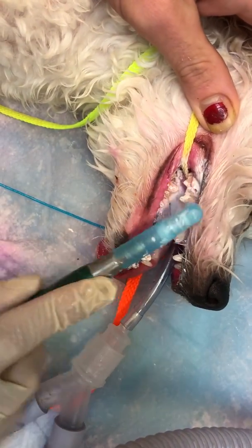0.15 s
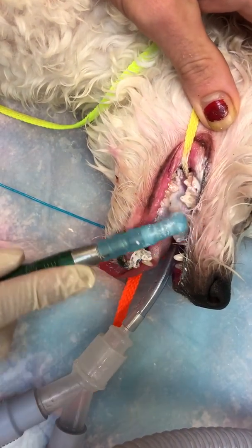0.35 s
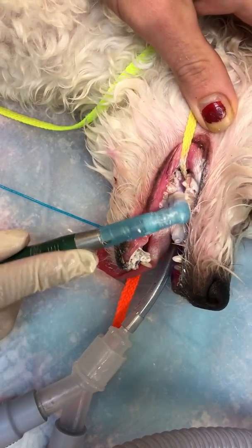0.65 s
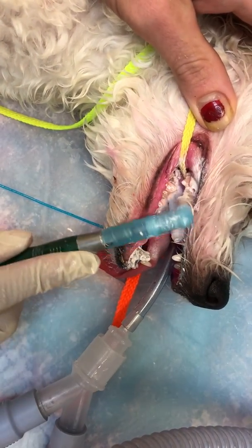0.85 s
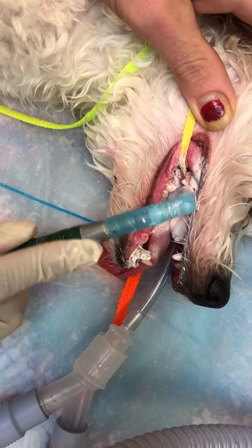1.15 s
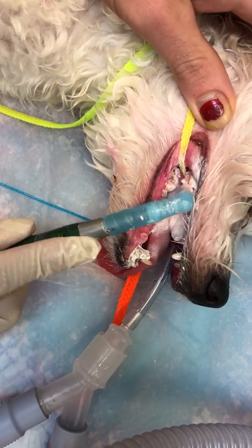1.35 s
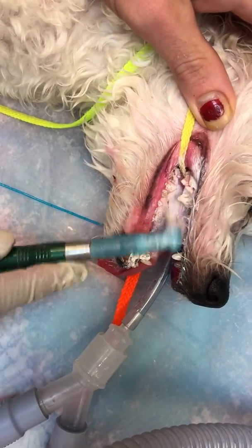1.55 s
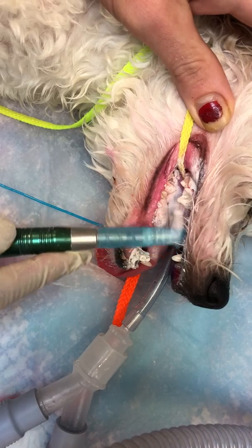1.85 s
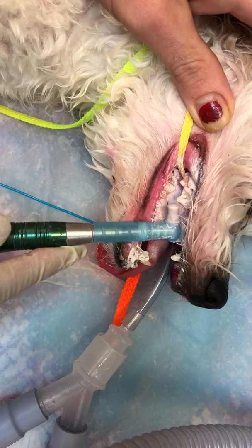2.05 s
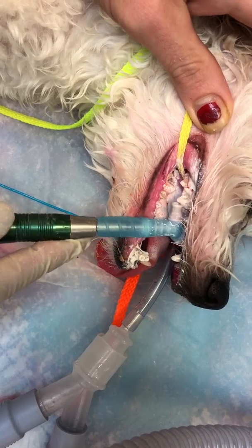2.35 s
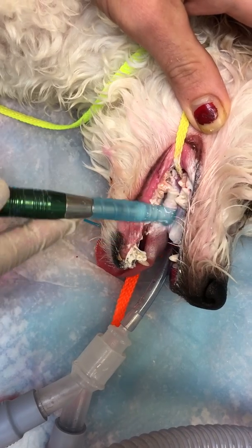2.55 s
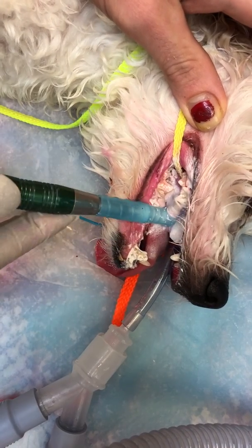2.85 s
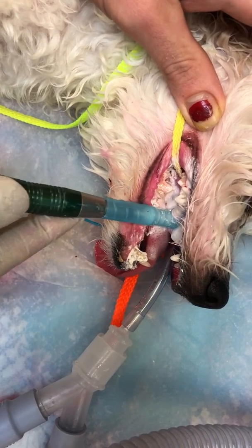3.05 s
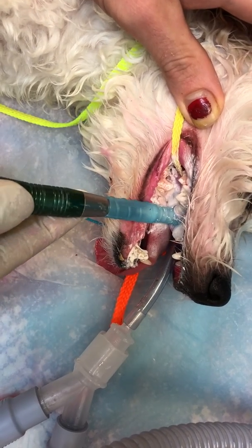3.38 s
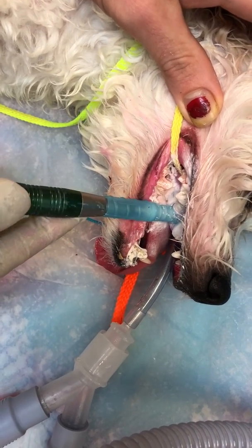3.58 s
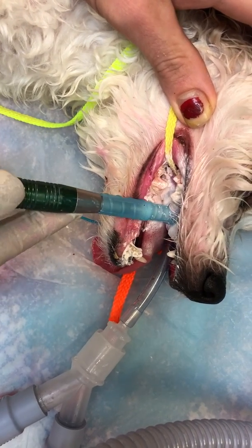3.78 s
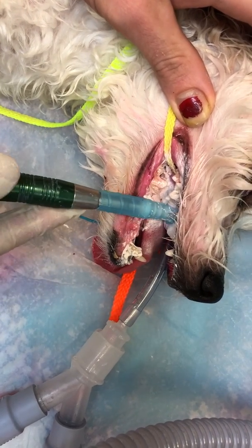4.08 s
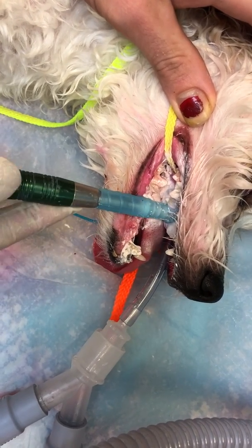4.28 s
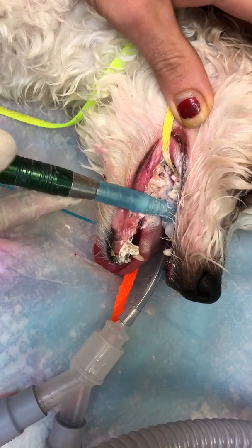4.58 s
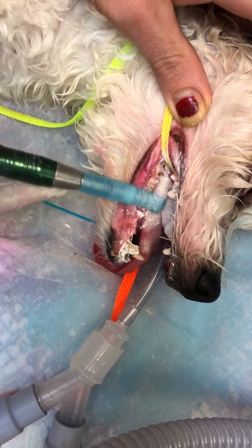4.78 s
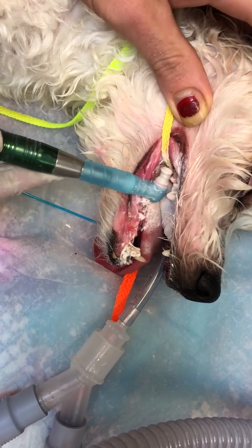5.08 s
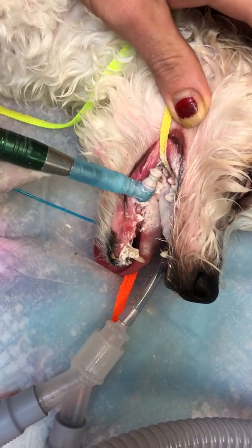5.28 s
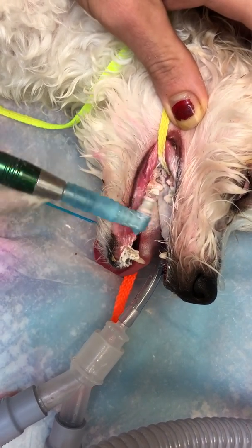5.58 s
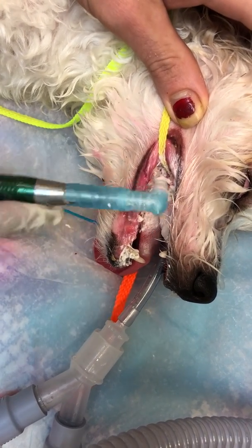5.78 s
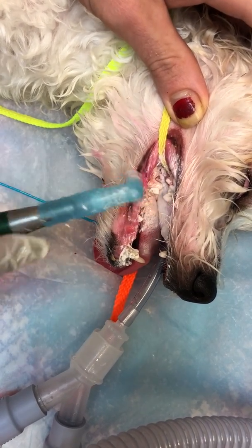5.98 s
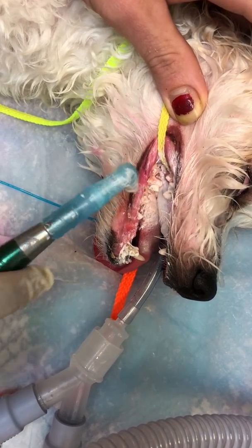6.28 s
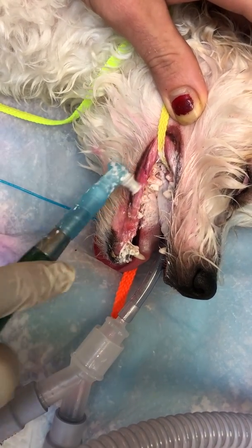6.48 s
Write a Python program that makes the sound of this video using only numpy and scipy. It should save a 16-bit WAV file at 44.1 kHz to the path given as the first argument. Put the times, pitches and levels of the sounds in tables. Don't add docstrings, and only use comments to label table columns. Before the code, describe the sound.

A small air-driven polishing handpiece is already running at the start and never stops, heard close on a mono phone microphone in a clinic room. Its high, steady whine stacks several piercing tones around two to eight kilohertz, with a metallic ring and fast gear chatter, about seventy knocks a second, making a rough buzz. From 0 to 1.6 s short touches on teeth make the pitch dip slightly and the rattle thicken. Around 1.8 to 2.4 s the ring thins. From about 2.7 s it turns brighter, with stronger air hiss and crisp clicking, and longer presses at 3.1 to 4.9 s hold the pitch a little lower. A soft, low table thud lands near 4.95 s. The pitch then rises slightly; hiss recedes after 5.7 s as the whine wavers to the end at about 6.5 s. A low compressor hum and dull ventilation noise continue unchanged underneath.

```python
import sys
import numpy as np
from scipy import signal
from scipy.io import wavfile
from scipy.ndimage import uniform_filter1d

SR = 44100
rng = np.random.default_rng(int(sys.argv[2]) if len(sys.argv) > 2 else 0)


def store_pcm(level_fs):
    pcm = np.round(np.clip(level_fs, -1, 1) * 32767).astype(np.int16)
    wavfile.write(sys.argv[1], SR, np.atleast_2d(pcm).T)


def gain_from_db(level_db):
    decades = np.asarray(level_db, float) / 20
    return 10 ** decades


N = 292383
T = np.arange(N) / SR

# [t/s, exhaust nearness/dB, grip on the sleeve/dB]
NEARNESS = [(.12, -38, -40), (.3, -38.5, -44), (.84, -40.5, -42), (1.42, -38, -39.5), (1.7, -40.5, -42),
            (2.1, -40, -40), (2.4, -35, -38), (2.54, -36, -40.5), (2.85, -29.5, -36.5), (3.64, -26, -32),
            (4.2, -29, -37.5), (4.46, -27.5, -36.5), (5.04, -29.5, -40), (5.46, -28, -37),
            (5.66, -29.5, -43), (5.9, -36, -42), (6.15, -38, -45), (6.35, -36, -41)]


def amp_rms(db, x):
    return gain_from_db(db) * x / np.sqrt(np.mean(x ** 2) + 1e-20)


def read_spectrum(points, hz):
    f, value = np.transpose(points)
    return np.interp(np.log(hz + 1), np.log(f + 1), value)


def curves(rows):
    s, *columns = np.transpose(rows)
    return [np.interp(T, s, column) for column in columns]


def drift(hz):
    b, a = signal.butter(2, min(hz / SR * 2, .9))
    return amp_rms(0, signal.lfilter(b, a, rng.standard_normal(N)))


def noise(points, patchy_db):
    frames, hz = N // 256 + 5, np.fft.rfftfreq(1024, 1 / SR)
    a, b, patches = rng.standard_normal((frames, 513, 3)).T
    patches = uniform_filter1d(patches, size=9, axis=0)
    patches = amp_rms(0, uniform_filter1d(patches, size=60, axis=1))
    z = (a + 1j * b) * gain_from_db(read_spectrum(points, hz)[:, None] + patchy_db * patches)
    return amp_rms(0, signal.istft(z, nperseg=1024, noverlap=768)[1][:N])


def click(points):
    hz = abs(np.fft.fftfreq(2048, 1 / SR))
    log_gain = np.log(gain_from_db(read_spectrum(points, hz)))
    phase = -signal.hilbert(log_gain).imag
    pulse = np.fft.ifft(np.exp(log_gain + 1j * phase)).real[:512]
    return pulse / np.linalg.norm(pulse)


def compressor():
    # [multiple of the pump speed, level/dB]
    pump_tones = [(2, -61.5), (4, -49.5), (5, -91), (6, -54), (7, -63.5), (8, -46), (9, -48), (10, -44.5),
                  (11, -52.5), (12, -53), (13, -64.5), (14, -64), (16, -61.5), (17, -64.5), (19, -60.5),
                  (20, -63.5), (21, -58), (22, -66.5), (29, -65.5), (32, -79), (33, -56.5), (34, -58.5),
                  (35, -60), (36, -58), (39, -55),
                  (43, -84), (52, -62)]
    # [f/Hz, level per Hz/dB]
    room_colour = [(21, -48), (35, -5), (82, -19.5), (135, -2), (208, -5), (254, -8), (336, -13),
                   (620, -14), (787, -12), (998, -16), (1510, -19), (1960, -19), (2160, -14.5),
                   (3350, -13.5), (4000, -17.5), (5200, -50), (8800, -120)]
    pump_hz, room_db = 23.385, -41
    turns = pump_hz * T + 0.0036 * drift(1.6)
    hum = np.zeros(N)
    for k, db in pump_tones:
        k = round(k)
        room_phase = .62 * k ** 2
        hum += np.sqrt(2) * gain_from_db(db) * np.sin(2 * np.pi * k * turns + room_phase)
    return hum + gain_from_db(room_db) * noise(room_colour + [(7000, -60)], patchy_db=1.9)


def bumps():
    # [t/s, level/dB, time to fade by 60 dB/s]
    hits = [
        (4.94, -34, .14),
        (4.96, -31, .12),
        (4.99, -32.5, .16),
        (2.28, -43, .121),
    ]
    # [f/Hz, level per Hz/dB]
    table_colour = [(40, 3), (80, -3), (280, 3), (420, -10), (1000, -16.5), (1400, -29)]
    envelope = np.zeros(N)
    for start, db, t60 in hits:
        t = np.maximum(T - start, 0)
        rise = 1 - np.exp(-t / 0.0018)
        envelope += gain_from_db(db - 60 * t / t60) * rise
    return noise(table_colour, patchy_db=1.5) * envelope


def presses():
    # [start/s, length/s, speed sag/Hz, dull knock/dB, bright click/dB]
    touches = [(0.068, 0.095, 2.9, -44, -53), (0.303, 0.074, 0.16, -56, -47), (0.521, .12, 0.22, -52, -55),
               (0.663, .08, 1.5, -38.5, -47), (.75, 0.072, 0.35, -48, -44), (0.917, .17, 1.5, -46.5, -54),
               (1.079, .11, 4.5, -41, -53), (1.203, 0.085, 2.5, -52, -46), (1.348, 0.12, 3.4, -48, -44),
               (1.448, .15, 5, -45, -53), (1.674, 0.055, 0.23, -50, -59), (1.795, .06, 0.7, -44, -55),
               (2.276, 0.086, 2.95, -65, -60), (2.491, 0.11, 1.36, -70, -46), (2.662, 0.087, 3.5, -57, -37),
               (2.765, .1, 3.3, -57, -41), (2.922, 0.13, 1.4, -50, -55), (3.119, 0.33, 1.6, -41, -60),
               (3.47, 0.59, 1.59, -39.5, -45), (4.298, 0.23, 2.74, -48, -37),
               (4.562, 0.3, 2.65, -51, -39.5), (5.301, 0.36, 1.1, -56, -48), (5.639, .16, 0.21, -56, -42),
               (5.938, 0.21, .2, -68, -56)]
    ramp_s = .04
    idle_dull_db, idle_bright_db = -60, -45.5
    start, length, sag, dull_db, bright_db = np.transpose(touches)[..., None]
    shape = np.clip(np.minimum(T - start, start + length - T) / ramp_s, 0, 1)

    def level(db, idle_db):
        return 20 * np.log10(gain_from_db(idle_db) + (gain_from_db(db) * shape).sum(0))
    return (sag * shape).sum(0), level(dull_db, idle_dull_db), level(bright_db, idle_bright_db)


def air():
    # [f/Hz, level per Hz/dB]
    hiss_colour = [(900, -34), (1300, -23), (1900, -7.5), (2700, -21), (3300, -13), (3900, -9), (5000, -6),
                   (7000, -1), (8800, 0), (11500, -2.5), (14000, -2), (16000, -1.5)]
    # [f/Hz, level per Hz/dB]
    rub_colour = [(1200, -35), (1700, -14), (2800, -24), (3500, -0.5), (4000, 3), (4800, 2.5), (5800, 0),
                  (7000, -15)]
    hiss_db, grip_db = curves(NEARNESS)
    rub_db = grip_db + 0.096 * (presses()[1] + 50)
    bursts = gain_from_db(0.97 * drift(710))
    hiss = noise(hiss_colour, patchy_db=2.0) * bursts
    return gain_from_db(hiss_db + 2.0) * hiss + gain_from_db(rub_db - 2.0) * noise(rub_colour, patchy_db=1.5)


def knocks():
    dull_db, bright_db = presses()[1:]
    middle_near_db = -35
    first_db = dull_db - 9 + .9 * (curves(NEARNESS)[0] - middle_near_db)
    last_db = bright_db - 3 + 2.5 * np.tanh(drift(2.7))
    return first_db, dull_db, bright_db, last_db


def gear(turns):
    knock_angles = (.13, .32, .82)
    # [f/Hz, level/dB]
    dull_colour = [(600, -36), (1300, -18), (1900, -11), (2600, -18), (3100, -12), (3800, -2), (4600, 3),
                   (5500, -9), (9000, -13), (16000, -24)]
    # [f/Hz, level/dB]
    bright_colour = [(1500, -22), (2500, 6.5), (5000, 7.5), (7000, 8), (10000, 11), (13000, 11.5),
                     (16000, 6), (20000, -44)]
    # (angle number, colour, gain dB, spread dB, scatter in cup turns, share of chatter)
    contacts = [(0, dull_colour, 3, .8, .001, 0),
                (1, dull_colour, 3, 1.2, .001, 0),
                (1, bright_colour, -.5, 2.2, .008, .8),
                (2, bright_colour, 0, 2.2, .02, .9)]
    cup_turns = turns / 4.75
    out = np.zeros(N)
    for db, (angle, colour, gain_db, spread_db, scatter, chatter) in zip(knocks(), contacts):
        chance = rng.standard_normal((int(cup_turns[-1]) - 1, 2))
        knock_turns = np.arange(len(chance)) + knock_angles[angle] + scatter * chance[:, 0]
        at = np.searchsorted(cup_turns, knock_turns)
        train = np.zeros(N)
        train[at] = gain_from_db(db[at] + spread_db * chance[:, 1] + gain_db) * np.sqrt(SR / 70)
        rebounds = signal.lfilter([0, .45], [1, -.95], train) * rng.standard_normal(N)
        hits = np.sqrt(1 - chatter ** 2) * train + chatter * .7 * rebounds
        out += signal.oaconvolve(hits, click(colour))[:N]
    return out


def rotor():
    # [t/s, speed/Hz]
    free_speed = [(.14, 335.5), (.27, 341), (.56, 343), (.68, 339.8), (2.08, 339), (2.3, 336), (2.7, 334.5),
                  (2.95, 331.7), (3.45, 329), (4.0, 326.9), (4.16, 329.7), (4.83, 330), (4.96, 336.3),
                  (5.65, 337.4), (5.87, 339), (6.0, 343.2), (6.39, 343.2), (6.45, 340.7)]
    # [t/s, order 6/dB, order 12/dB]
    low_vanes = [(.12, -50, -39), (.36, -76, -42), (.62, -53.5, -38), (1.5, -49.5, -43.5), (1.64, -52, -41),
                 (1.77, -64, -41), (1.9, -51, -44), (2.15, -47, -39.5), (2.7, -45.5, -39.5),
                 (2.76, -44.5, -47), (3.15, -42.5, -42), (3.38, -42, -50), (3.52, -42.5, -40.5),
                 (5.55, -40.5, -35.5), (5.95, -51, -39.5), (6.14, -50.5, -41), (6.36, -47.5, -51),
                 (6.45, -46, -39.5)]
    # [t/s, order 18/dB, order 24/dB]
    high_vanes = [(.1, -38.5, -49), (.26, -34, -56), (.65, -37.5, -58), (1.65, -36.5, -60),
                  (1.86, -43, -51), (2.02, -59, -43), (2.25, -63, -47), (2.62, -45, -56),
                  (2.85, -35.5, -48), (3.6, -36, -66), (4.1, -45, -55), (4.55, -52, -60), (5.05, -53, -42),
                  (5.25, -36.5, -38), (5.52, -43, -41), (5.85, -30.5, -55.5), (6.38, -38, -52),
                  (6.5, -47, -60)]
    # [t/s, level/dB]
    ringing = [(.14, -34.5), (.35, -40.5), (.95, -40.5), (1.5, -36.5), (1.64, -39), (1.8, -49),
               (2.25, -52.5), (2.9, -34), (4.4, -33), (4.78, -33.5), (5.1, -42.5), (5.4, -37),
               (5.63, -37.5), (5.75, -54), (5.88, -38.5), (6.12, -43), (6.26, -35.5), (6.6, -50.5)]
    # [multiple of rotor speed, level re ring/dB]
    ring_orders = [(19, -11.5), (20, -8.5), (21, -3), (22, -11.5), (23, -10.5)]
    # [multiple of rotor speed, level re ring/dB]
    faint_orders = [(16, -30), (17, -20), (25, -59), (26, -30), (28, -43), (30, -15), (32, -29), (36, -18),
                    (42, -19)]
    housing_hz = 7003
    db6, db12 = curves(low_vanes)
    db18, db24 = curves(high_vanes)
    ring_db = curves(ringing)[0]
    hz = curves(free_speed)[0] - presses()[0]
    centre = housing_hz / hz
    turns = np.cumsum(hz * (1 + .0003 * drift(40))) / SR

    def order(k, db, flutter_db):
        level = gain_from_db(db + flutter_db * drift(9.8))
        return np.sqrt(2) * level * np.sin(2 * np.pi * (round(k) * turns + rng.random()))
    vanes = order(6, db6, .4) + order(12, db12, .6) + order(18, db18, .8) + order(24, db24, 1.1)
    ring = sum(order(k, ring_db + db + 6.0 * (k - 21) * (centre - 21), 1.86) for k, db in ring_orders)
    faint = sum(order(k, ring_db + db, 2.8) for k, db in faint_orders)
    low = signal.lfilter(*signal.butter(2, 600 / SR * 2), rng.standard_normal(N))
    carrier = np.cos(2 * np.pi * np.cumsum(centre * hz) / SR)
    gate = 1 + 0.16 * np.cos(2 * np.pi * turns)
    puffs = amp_rms(0, low * carrier * gate)
    return vanes + ring + faint + gain_from_db(ring_db - 1.0) * puffs, turns


def scene():
    whine, turns = rotor()
    mono = compressor() + bumps() + air() + gear(turns) + whine
    return np.array([mono, mono])


def roll_off(x):
    return signal.sosfilt(signal.butter(12, 17000, fs=SR, output="sos"), x)


def record(dry):
    low_cut = signal.butter(8, 40, "high", fs=SR, output="sos")
    treble_edge = signal.firwin(511, 15780, window=("kaiser", 9), fs=SR)
    x = signal.sosfilt(low_cut, dry)
    x = signal.oaconvolve(x, treble_edge[None], "same")
    return roll_off(x)


dry = scene()
out = record(dry)
store_pcm(out)
```